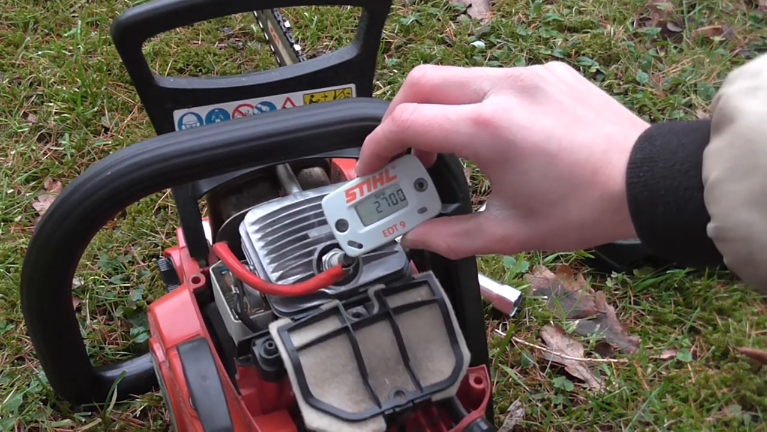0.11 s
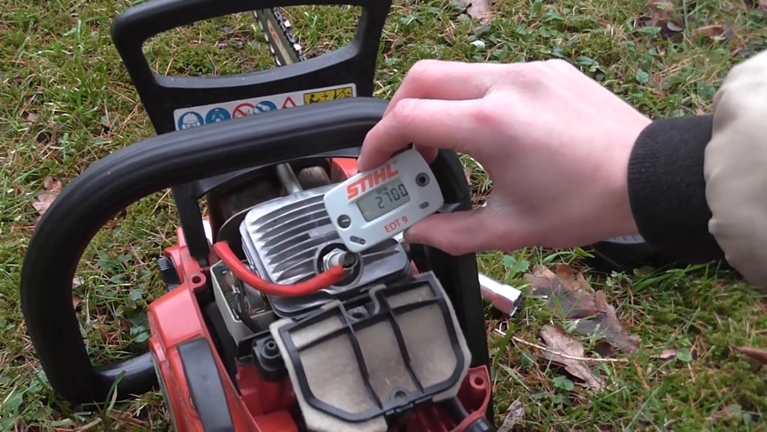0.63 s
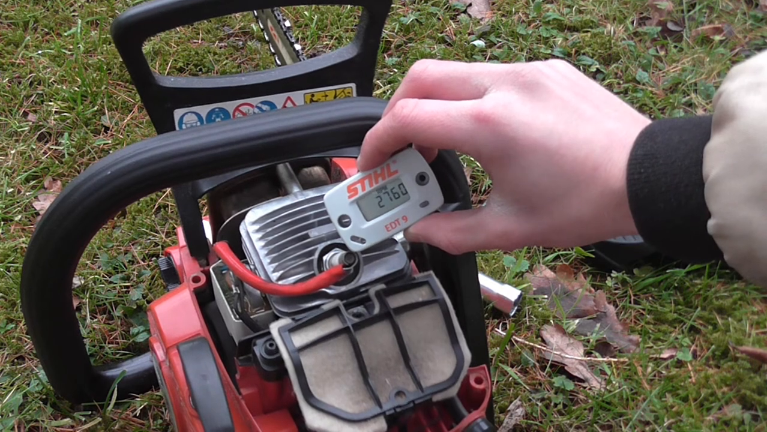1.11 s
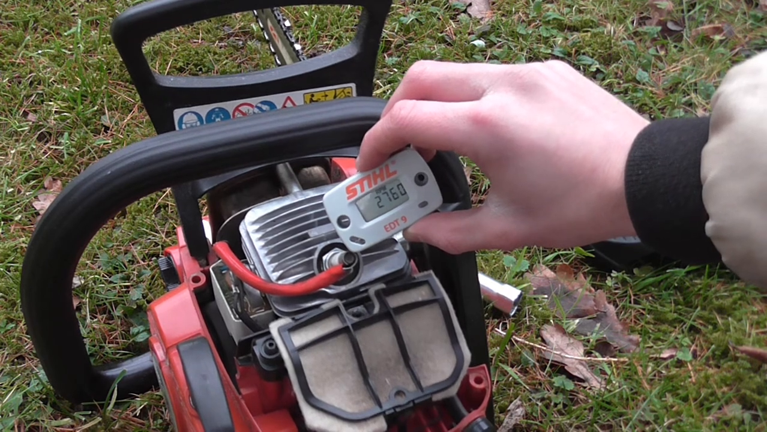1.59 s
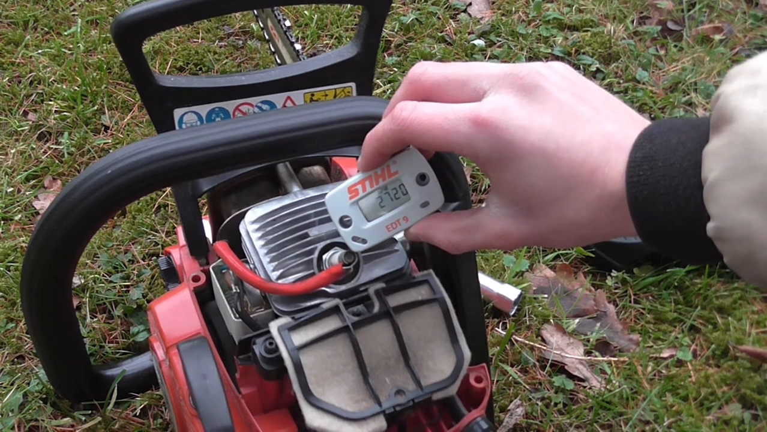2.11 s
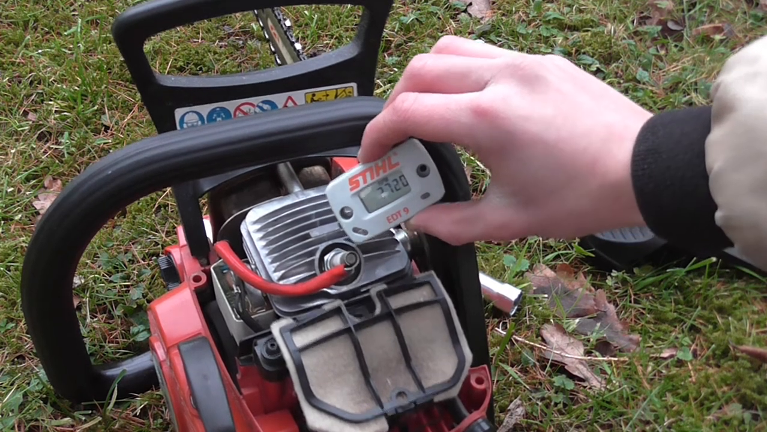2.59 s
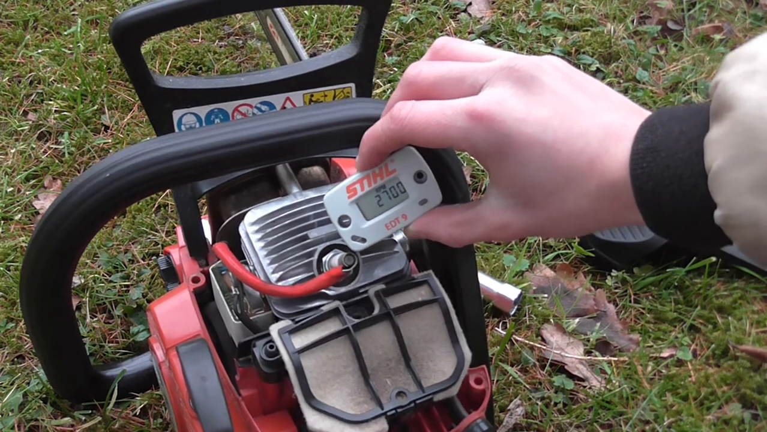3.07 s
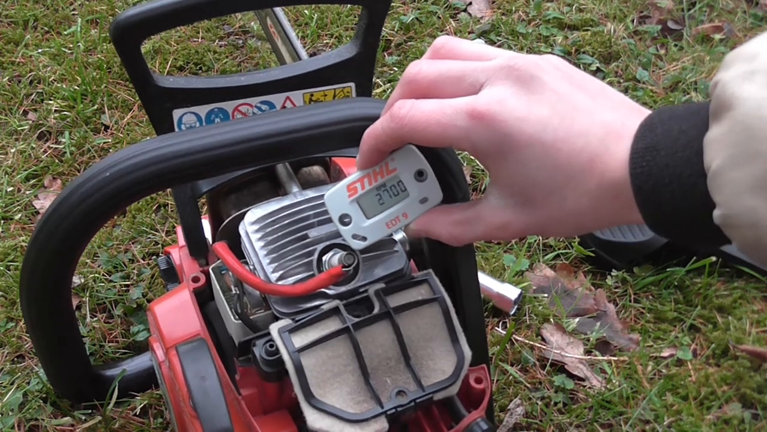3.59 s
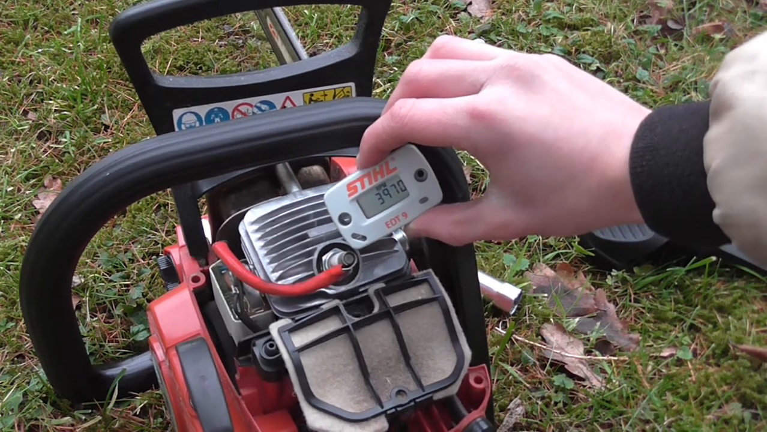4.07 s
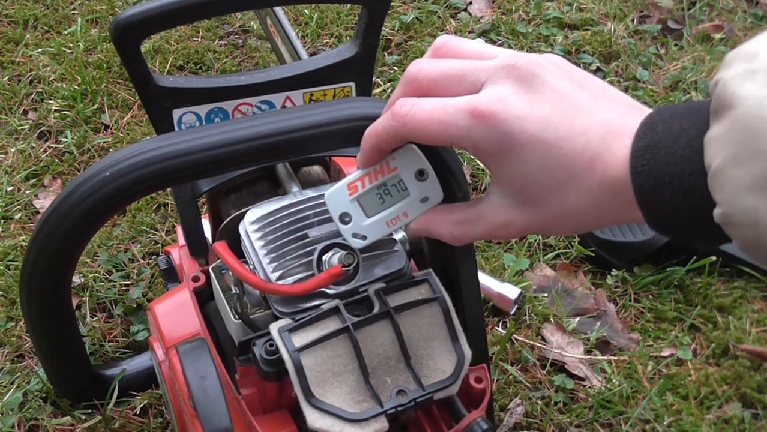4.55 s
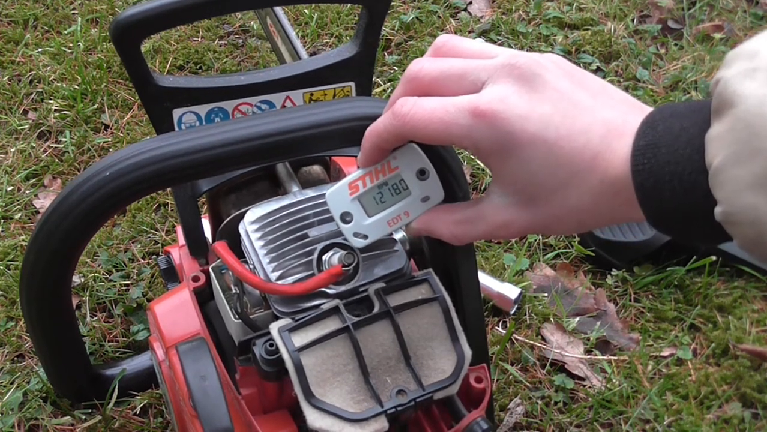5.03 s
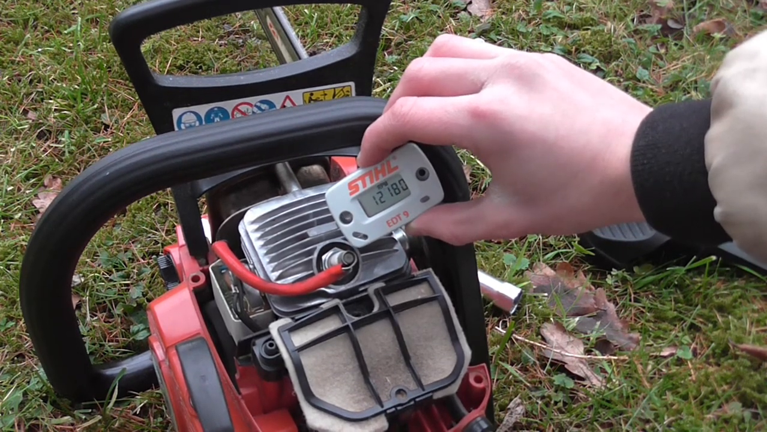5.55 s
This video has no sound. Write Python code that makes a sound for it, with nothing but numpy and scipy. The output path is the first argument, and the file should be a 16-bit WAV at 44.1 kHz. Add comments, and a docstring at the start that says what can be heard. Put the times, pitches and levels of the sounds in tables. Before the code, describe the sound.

A small two-stroke chainsaw engine runs very close, outdoors, dry, with barely audible air behind it. From 0 to 2.8 s it idles lumpily: about 45 soft, low puffs a second, with harder, hollow cracks at roughly 15 a second where it actually fires. The firing is fairly regular at first, then stumbles from about 1.1 to 2.3 s with weaker, closer-spaced pops. Light metallic rattle and hiss pulse along with it. At 2.81 s the throttle linkage clacks and a rush of air bursts in; the engine catches and its honking intake note sweeps up about fourfold, smooth and rising, a thin whine gliding through near 3.2 s. By 3.4 s it reaches top speed, around 205 turns a second, and holds until about 5.6 s: a loud, raspy, nearly constant drone with a gritty undertone beating every three turns, broad hiss, metallic sizzle and faint fan whistle. It does not slow down.

```python
"""Soft puffs and hard cracks: a small two-stroke idles close by, puffing each turn and burning on only some.
Damped swings make the puffs, ringing modes the cracks; crank-pulsed noise rattles and hisses over faint air.
The throttle snaps open in a noise burst and the intake honks: crank harmonics shaped by resonances.
The speed climbs about fourfold and holds, with a beat every three turns.
The fan whistles faintly and a thin whine glides through the run-up."""
import sys
import numpy as np
from scipy import signal
from scipy.fft import rfft, irfft, next_fast_len
from scipy.io import wavfile
from scipy.ndimage import uniform_filter1d

SR = 44100
rng = np.random.default_rng(int(sys.argv[2]) if len(sys.argv) > 2 else 0)


def wav_record(signal):
    """Record a signal, one row per channel, as 16-bit PCM in the file named by sys.argv[1]."""
    frames = np.transpose(np.atleast_2d(signal))
    bounded = np.clip(frames, -1, 1)
    # unit amplitude maps onto the largest positive 16-bit level
    quanta = np.round(bounded * 32767).astype(np.int16)
    wavfile.write(sys.argv[1], SR, quanta)


def how_loud(loudness_db):
    """Turn decibels into a plain amplitude multiplier (0 dB gives 1, 20 dB gives 10)."""
    steps = np.asarray(loudness_db, float) / 20
    return 10 ** steps


N = 249594
T = np.arange(N) / SR
IDLE_END = 2.812  # the throttle opens [s]


def evened(x):
    """Scales a signal to an rms of 1."""
    return x / np.sqrt(np.mean(x ** 2) + 1e-20)


def read(points, hz):
    """Reads a curve over frequency, straight between its points on a log pitch axis."""
    f, value = np.transpose(points)
    return np.interp(np.log(hz + 1), np.log(f + 1), value)


def add(mix, s, sound):
    """Adds a sound into the mix from s seconds on."""
    part = mix[round(s * SR):][:len(sound)]
    part += sound[:len(part)]


def coloured(x, gain):
    """Applies a gain given as a function of frequency."""
    size = next_fast_len(N + 4096)
    return irfft(rfft(x, size) * gain(np.fft.rfftfreq(size, 1 / SR)), size)[..., :N]


def wander(hz):
    """Slow random drift with an rms of 1, made of noise below about hz."""
    return evened(coloured(rng.standard_normal(N), lambda f: 1 / (1 + (f / hz) ** 4)))


def modes(table, hz):
    """Complex response of a row of resonances, neighbours swinging in opposite sense."""
    response = 0
    for k, (f, width, db) in enumerate(table):
        peak = 1j * hz * width / (f ** 2 - hz ** 2 + 1j * hz * width)
        response = response + (-1) ** k * how_loud(db) * peak
    return response


# first kick, then the clutch bites and holds the crank back: (time [s], speed [turns per s])
KICK = [(2.812, 40), (2.83, 41.5), (2.851, 55.5), (2.885, 69), (2.915, 74), (2.945, 80.5), (2.975, 90)]
# speed held by the governor: (time [s], speed [turns per s])
HOLD = [(3.395, 208.3), (3.6, 202.4), (3.8, 201.7), (4.06, 202.4), (4.13, 204.3), (4.22, 203),
        (4.68, 204.3), (4.76, 205.8), (4.9, 203.7), (5.1, 206.9), (5.46, 204.7), (5.6, 207.2)]
HELD_S, HELD_HZ = HOLD[0]  # start of the hold [s] and its first speed [turns per s]


def open_speed():
    """Crank turns per second with the throttle open: kick, run-up towards a free speed, governed hold."""
    free_hz, climb_s = 253, 0.325  # speed aimed for [turns per s], time constant [s]
    start, hz = KICK[-1]
    run_up = free_hz - (free_hz - hz) * np.exp(-(T - start) / climb_s)
    speed = np.where(T < start, np.interp(T, *np.transpose(KICK)), run_up)
    return np.where(T < HELD_S, speed, np.interp(T, *np.transpose(HOLD)))


def governed():
    """Share of the governor's beat: 0 in the run-up, rising to 1 over the last 95 ms before the hold."""
    return np.clip(1 + (T - HELD_S) / 0.095, 0, 1)


# burns at idle: (time [s], exhaust thump level [dB], crack level [dB])
BURNS = [(0.0417, -6, -5.5), (0.1291, -7.5, -7.5), (0.1961, -5, -5), (0.262, -6, -5.5), (0.331, -5, -7.5),
         (0.3982, -7, -5.5), (0.4445, -18, -18), (0.4665, -6, -7), (0.5348, -5, -3.5), (0.5969, -8.5, -8),
         (0.6856, -6.5, -4.5), (0.7492, -12, -20), (0.7716, -7.5, -10), (0.8415, -6.5, -5.5),
         (0.9083, -6.5, -5.5), (0.9728, -5, -6.5), (1.0373, -6, -5.5), (1.1, -10, -11.5),
         (1.1437, -14, -18), (1.1667, -12, -18), (1.1872, -15, -14), (1.2802, -9, -14), (1.3527, -11, -9),
         (1.403, -7, -11), (1.4508, -10, -11.5), (1.476, -4.5, -5), (1.5466, -3.5, -2.5),
         (1.6112, -4.5, -4.5), (1.6767, -5.5, -5.5), (1.7183, -10, -12), (1.762, -15.1, -19),
         (1.7857, -10, -10), (1.831, -6, -7.5), (1.8745, -15, -10), (1.897, -3.5, -3.5), (1.961, -10, -11),
         (1.9846, -4.5, -8), (2.0296, -13, -12), (2.0529, -9, -10), (2.077, -6, -18), (2.0988, -9.5, -9),
         (2.1222, -3.5, -6.5), (2.1681, -7, -7), (2.1925, -8, -12), (2.2141, -3.5, -4), (2.2816, -5, -3.5),
         (2.3459, -5.5, -3), (2.4293, -13, -8), (2.4977, -3.5, -4), (2.5633, -6, -5), (2.6293, -8.5, -16),
         (2.6507, -8, -9.5), (2.6962, -9, -28), (2.718, -5.5, -4), (2.7828, -4.5, -4.5)]


def crank():
    """Turns of the crank: whole counts between burns at idle, then the summed speed."""
    idle_hz = 44  # turns per s, used to count the turns from burn to burn
    burn_s = [b[0] for b in BURNS]
    # about two turns more at either end
    s = np.array([burn_s[0] - 2 / 46.5] + burn_s + [burn_s[-1] + 2 / 46.8])
    count = np.append(0, np.cumsum(np.round(np.diff(s) * idle_hz)))
    idle = np.interp(T, s, count)
    speed = open_speed() * (1 + 0.0014 * wander(hz=30))
    fast = np.cumsum(speed * (T > IDLE_END)) / SR - 0.24
    return s, count, np.where(T < IDLE_END, idle, fast), speed


def puff(hz, t60, rise):
    """The muffler sucks, then swings out a few damped cycles and a short overtone, in phase at 3.2 ms."""
    t = np.arange(1800) / SR
    angle = 2 * np.pi * hz * (t - 0.0032)
    overtone = 0.6 * how_loud(-60 * t / 0.037) * np.cos(1.73 * angle + 0.86)
    swing = how_loud(-60 * t / t60) * (np.cos(angle) + overtone)
    swing *= (1 - np.exp(-t / rise)) ** 2
    return swing / abs(swing).max()


# ringing of the exhaust port: (frequency [Hz], relative level [dB], t60 [s])
CRACK_MODES = [(762, 1.5, 0.012), (1142, 0.5, 0.011), (1450, -3.5, 0.0094), (1710, 0, 0.0057),
               (2454, -10, 0.0073), (3630, -9.5, 0.0042)]


def crack(db, bright, chance):
    """The exhaust port rings in damped modes; bright tilts them towards the upper ones [dB per octave]."""
    t = np.arange(1000) / SR
    ring = 0
    for k, ((hz, mode_db, t60), (a, b)) in enumerate(zip(CRACK_MODES, chance)):
        level_db = db + mode_db + bright * np.log2(hz / 1100) + 2.3 * a
        tone = np.sin(2 * np.pi * hz * (1 + 0.03 * b) * t)
        ring = ring + (-1) ** k * how_loud(level_db - 60 * t / t60) * tone
    return ring * (1 - np.exp(-t / 0.0019))


# the idle breathes a little, middle level of an unburnt puff: (time [s], peak level [dB])
IDLE_PUFF = [(0, -10.5), (0.8, -10.5), (1.2, -9.5), (1.6, -8), (2.3, -7), (2.45, -9.5), (2.8, -10)]


def idle_exhaust(s, count):
    """A soft puff on each unburnt turn; a burn swaps in its own thump, a returning wave and a crack."""
    return_db, dry_crack_db = -3.5, -21  # returning wave against the puff; port ring without a burn
    out, burn = np.zeros(N), np.zeros(N)
    turn = np.arange(1, count[-1] + 1)
    chance = rng.standard_normal((len(turn), len(CRACK_MODES) + 2, 2))
    burns, t = dict(zip(count[1:], BURNS)), np.arange(4000) / SR
    flare = np.exp(-t / 0.025) + 2.3 * np.exp(-t / 0.0041)
    for k, ((a, b), (c, d), *spread) in zip(turn, chance):
        at = np.interp(k, count, s)
        puff_db = np.interp(at, *np.transpose(IDLE_PUFF))
        if k in burns:
            _, thump_db, crack_db = burns[k]
            add(out, at - 0.0032, how_loud(thump_db) * puff(hz=186.3, t60=0.019, rise=0.0024))
            # the pressure wave returns from the muffler's far wall
            back = puff(hz=203, t60=0.011, rise=0.00054)
            add(out, at + 0.0036, how_loud(puff_db + return_db + 0.74 * a) * back)
            # strong burns crack brighter
            add(out, at - 0.0024, crack(crack_db, bright=1.22 * (crack_db + 9.0), chance=spread))
            add(burn, at - 0.002, how_loud(crack_db + 3.5) * flare)
        else:
            soft = puff(hz=218 * (1 + 0.051 * b), t60=0.027 * (1 + 0.12 * d), rise=0.0022)
            add(out, at - 0.0032, how_loud(puff_db + 0.22 * a) * soft)
            ring_db = dry_crack_db + 2.0 * (puff_db + 8) + 3.7 * c
            add(out, at - 0.0024, crack(ring_db, bright=-10.5, chance=spread))
    # a side chamber of the muffler swallows one narrow band
    return coloured(out, lambda f: 1 - 0.4 * modes([(545, 25, 0)], f)), burn


# fins and covers: (frequency [Hz], width [Hz], relative level [dB])
METAL = [(5146, 83, 5.5), (5610, 28, 3), (6060, 86, -2.5), (9160, 100, -5), (10200, 110, -3),
         (11700, 130, -10), (11380, 350, -2.5)]
# colour of rattle and rushing gas at idle: (frequency [Hz], relative level [dB])
IDLE_RUSH = [(60, -30), (300, 0), (530, -5.5), (750, -4.5), (960, -9), (1500, 0), (2200, -6), (2900, -15),
             (4200, -8), (6200, -12.5), (7000, -17), (8400, -23), (10000, -19), (11800, -18.5),
             (15700, -35)]
# the same with the throttle open: (frequency [Hz], relative level [dB])
FULL_RUSH = [(90, -6.5), (600, -1.5), (1700, 3.5), (2200, -0.5), (2900, -8), (4300, 0.5), (5200, -3),
             (6500, -5), (7100, -5), (8300, -9), (9500, -7.5), (12000, -12), (12600, -7.5), (15700, -19.5)]


def rattle(turns, speed, burn):
    """Rushing gas and small metal knocks: noise pulsing with the crank and flaring after each burn.
    The second row comes from other parts of the body and reaches the two sides unlike."""
    idle_db, full_db, db_per_octave = -32, -16, 9.5  # levels [dB], rise with speed [dB per octave]
    gulp_db, gulp_s = 13.5, 0.12  # first rush of air through the opened throttle
    clean_db, clean_hz = -4, 4470  # while every turn burns alike, the rush below this pitch is weaker
    opened = T > IDLE_END
    effort = np.clip((speed - 60) / 130, 0, 1) * opened

    # about 1500 knocks a second in each row
    sizes = how_loud(3.5 * np.minimum(rng.exponential(1, (2, N)), 2))
    knocks = evened(uniform_filter1d((rng.random((2, N)) < 1500 / SR) * sizes, 30))
    drive = rng.standard_normal((2, N)) * (1 + 0.95 * (1 - 1.07 * effort) * knocks)

    beat = 1 + 0.21 * np.cos(2 * np.pi * (turns - 0.6)) + 0.046 * np.cos(4 * np.pi * (turns - 0.1))
    beat *= 1 + 0.037 * effort * np.cos(2 * np.pi * (turns - 0.4) / 3)
    # gulps of intake air
    beat *= 1 + 0.59 * opened * (1 - effort) * np.cos(2 * np.pi * (turns - 0.15))
    drive *= beat * how_loud(0.34 * wander(hz=63.6)) * (1 + 3.43 * np.tanh(0.4 * burn))

    idle = coloured(drive, lambda f: how_loud(read(IDLE_RUSH, f)) * (1 + how_loud(1.5) * abs(modes(METAL, f))))
    full = coloured(drive, lambda f: how_loud(read(FULL_RUSH, f)) * (1 + how_loud(2.5) * abs(modes(METAL, f))))
    low = coloured(full, lambda f: 1 / (1 + (f / clean_hz) ** 6))
    full -= (1 - how_loud(clean_db)) * (1 - governed()) * low
    # the thin fins buzz in patches of their own
    fins = coloured(idle, lambda f: 1 / (1 + (8200 / (f + 1)) ** 8))
    idle += (how_loud(1.8 * wander(hz=70)) - 1) * fins
    # a burn also spits bright gas past the port
    spit = coloured(drive * burn, lambda f: 1 / (1 + (7500 / (f + 1)) ** 4) / (1 + (f / 13000) ** 4))
    idle = evened(idle) + how_loud(-23.0) * spit

    open_db = full_db + db_per_octave * np.log2(speed / HELD_HZ)
    open_db += gulp_db * np.exp(-((T - IDLE_END) / gulp_s) ** 2)
    level = how_loud(np.where(T < IDLE_END, idle_db, open_db))
    # fan blades pass 24 times a turn, in turbulent air; front row only
    blades = how_loud(-16) * np.sqrt(effort) * wander(hz=90) * np.cos(2 * np.pi * 24 * turns)
    return level * ((1 - effort) * idle + effort * evened(full) + blades * [[1], [0]])


def breeze():
    """Faint low air movement at each microphone port: independent slow noise."""
    return how_loud(-54) * np.array([wander(hz=45), wander(hz=45)])


# exhaust resonances of the muffler: (frequency [Hz], width [Hz], level [dB])
MUFFLER = [(138, 59, -5.5), (251, 107, -2.5), (389, 135, -6.5)]
# intake resonances: (frequency [Hz], width [Hz], level [dB])
INTAKE = [(757, 710, -7), (992, 139, 3), (1850, 590, -12.5)]
# harmonics at full speed: (multiple of a third of the crank rate [1], relative level [dB])
FULL = [(1, -21.5), (2, -13.5), (3, -3), (4, -18), (5, -12.5), (6, -5.5), (7, -18.5), (8, -46), (9, -6.5),
        (10, -26), (11, -10.5), (12, -1.5), (13, -37), (14, -10.5), (15, 0.5), (16, -29), (18, -13),
        (21, -9), (22, -18.5), (23, -17.5), (24, -3.5), (25, -62), (26, -23), (27, -5), (29, -18),
        (30, -14), (31, -24), (32, -14), (36, -38), (38, -38), (39, -25.5)]


def open_throttle(turns, speed):
    """Crank orders through muffler and intake resonances; the governed three-turn beat fills in the thirds."""
    open_db, rise_db, rise_s = -16, -6.5, 0.032  # level, shortfall at first, its time constant [s]
    settle_db, settle_s = -0.76, 0.11  # the level sinks slightly once the governor works
    weak_order, weak_depth = 4.4, 0.66  # a valley among the crank orders during the run-up
    on = T > IDLE_END
    hz, angle = speed[on][::32], 2 * np.pi * turns[on] / 3  # spectra are set every 32 samples
    full = governed()[on][::32]
    top_db, out = dict(FULL), 0
    for k in range(1, 136):
        if k % 3 and k not in top_db:
            continue
        order = k / 3
        f = hz * order
        pulse = modes(MUFFLER, f) * np.exp(2j * np.pi * 0.14 * order)  # the exhaust opens a little earlier
        pulse = pulse + modes(INTAKE, f) / (1 + 1j * f / 1500) ** 2
        # a second, sharper pop as the other port opens over half a turn later, fading as the speed climbs
        pop = np.exp(-2j * np.pi * 0.594 * order) / (1 + (f / 2100) ** 4)
        pulse = pulse + how_loud(-15.5) * (60 / hz) ** 1.5 * pop
        climb = abs(pulse) * np.sqrt(hz / 200) / (1 + (f / 2700) ** 6) * (k % 3 == 0)
        climb = climb * (1 - weak_depth * np.exp(-(order - weak_order) ** 2))
        size = (1 - full) * how_loud(13.0) * climb + full * how_loud(top_db.get(k, -60))
        line = np.repeat(size * np.exp(1j * np.angle(pulse)), 32)[:len(angle)]
        out = out + (line * np.exp(1j * k * angle)).real
    since, held = T[on] - IDLE_END, np.maximum(T[on] - HELD_S, 0)
    db = open_db + rise_db * np.exp(-(since / rise_s) ** 2)
    db += settle_db * (1 - np.exp(-held / settle_s))
    level = np.sqrt(uniform_filter1d(out ** 2, 3000))
    uneven = 1 + (0.0057 + 0.0076 * governed()[on]) * wander(hz=97)[on]  # no two burns are alike
    sound = np.zeros(N)
    sound[on] = out / level * how_loud(db) * uneven * np.clip(since / 0.0022, 0, 1)
    return sound


# throttle linkage, before its colouring: (time [s], level [dB], t60 [s])
SNAP = (2.8128, -13, .04)


def snap():
    """The linkage clacks as the trigger is pulled: a dying noise burst through one broad resonance."""
    s, db, t60 = SNAP
    out, t = np.zeros(N), np.arange(2000) / SR
    add(out, s, how_loud(db - 60 * t / t60) * rng.standard_normal(2000) * (1 - np.exp(-t / 0.00034)))
    return coloured(out, lambda f: (0.41 + abs(modes([(5430, 2500, 0)], f))) / (1 + (f / 11500) ** 4))


def whine(turns):
    """A thin tone at 22 times the crank rate glides up and is gone before full speed."""
    peak_db, peak_s, spread_s = -33, 3.22, 0.065
    swell = np.exp(-((T - peak_s) / spread_s) ** 2)
    return how_loud(peak_db) * swell * np.cos(2 * np.pi * 22 * turns)


SIDE = np.array([[0.5], [-0.5]])  # half of a left-right difference to each side
# likeness of the rattle on the two sides: (frequency [Hz], likeness [0..1])
SAME = [(60, 0.48), (99, 0.72), (160, 0.97), (270, 1), (450, 0.71), (740, 0.4), (1220, 0.93), (2010, 0.89),
        (3330, 0.96), (5500, 1), (9080, 0.95), (15000, 0.92)]
# the open intake's balance, left over right: (frequency [Hz], level [dB])
OPEN_LEFT_DB = [(110, -1), (200, -1.5), (380, -1), (700, -4), (1290, 2.5), (2380, -3.5)]


def scene():
    """One engine in front, its rattle a little spread, its open throttle weighted per side by pitch."""
    s, count, turns, speed = crank()
    exhaust, burn = idle_exhaust(s, count)
    front, spread = rattle(turns, speed, burn)
    middle = exhaust + front + snap() + whine(turns)
    apart = coloured(spread, lambda f: how_loud(-1.0) * np.sqrt(1 - np.clip(read(SAME, f), 0, 1)))
    intake = coloured(open_throttle(turns, speed), lambda f: how_loud(SIDE * read(OPEN_LEFT_DB, f)))
    return np.array([middle + apart, middle - apart]) + intake + breeze()


def band_limit(x):
    """A steep low-pass at the top of the band."""
    return signal.sosfilt(signal.butter(12, 15820, fs=SR, output="sos"), x)


# balance of the microphone ports, left over right: (frequency [Hz], level [dB])
LEFT_DB = [(60, -4), (110, 0), (200, -1), (380, -2), (700, 2), (1290, 0), (2380, 2.5), (4400, -0.5),
           (8120, 0.0), (15000, 1)]
# phase lead of the left port over the right: (frequency [Hz], phase [rad])
LEFT_LEAD = [(0, 0), (480, 0.4), (1300, 0.0), (2000, 0.1), (2900, -0.2), (3800, 0.0), (9300, 0.0),
             (10300, 0.4), (11000, 0.1), (12000, 0.2), (13300, 0.0)]


def record(dry):
    """The input stage rounds off the highest crests; two ports differ in level and phase; the bass is cut."""
    rounded = 0.94 * np.tanh(dry / 0.87)

    def port(f):
        balance = how_loud(SIDE * read(LEFT_DB, f)) * np.exp(1j * SIDE * read(LEFT_LEAD, f))
        return balance / (1 + (92 / (f + 1)) ** 3)

    mix = coloured(rounded, port)
    return band_limit(mix)


dry = scene()
out = record(dry)
wav_record(out)
```